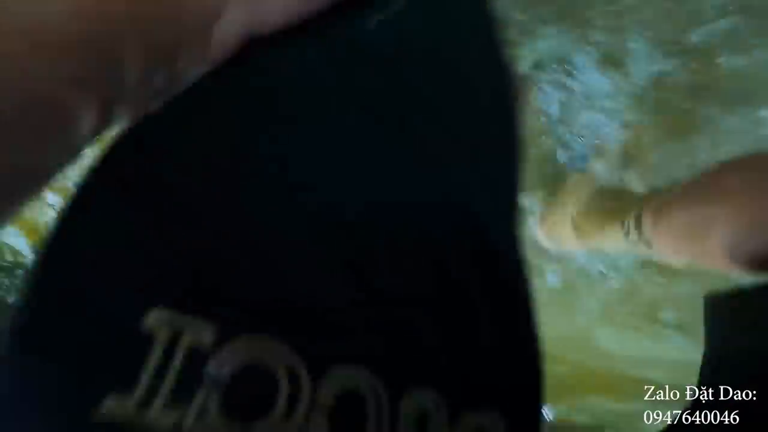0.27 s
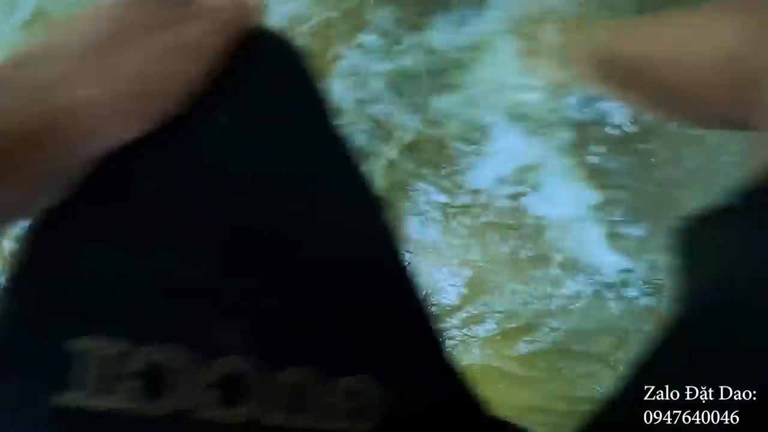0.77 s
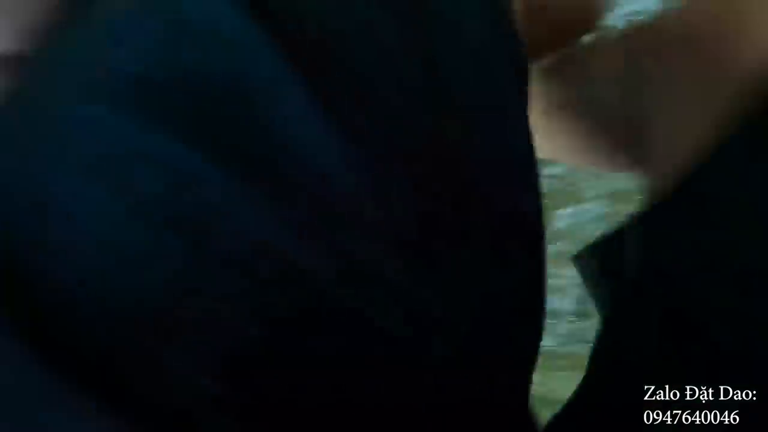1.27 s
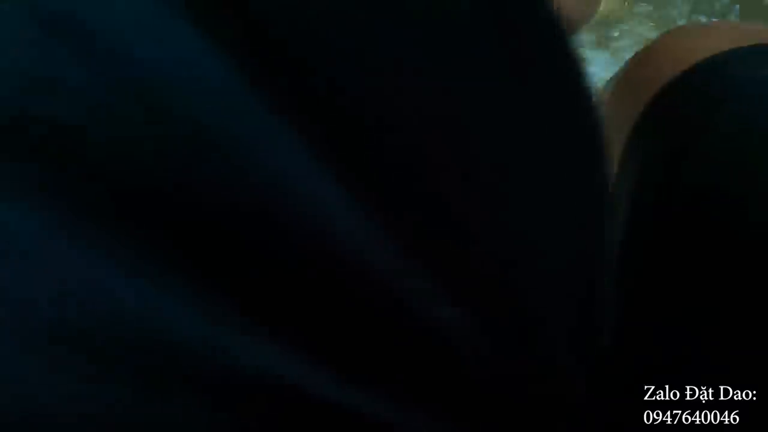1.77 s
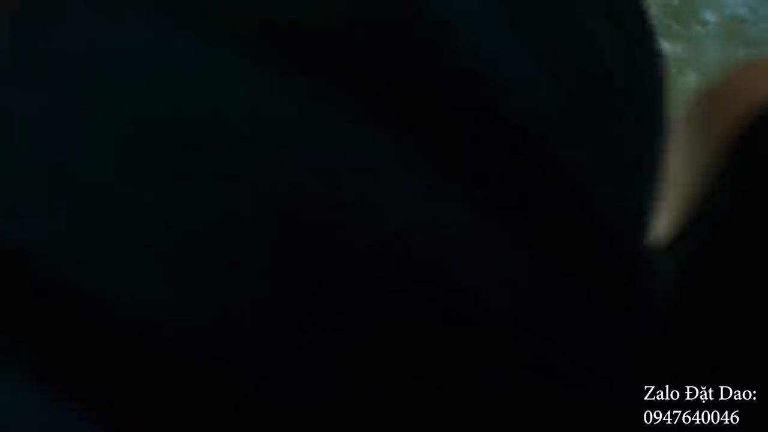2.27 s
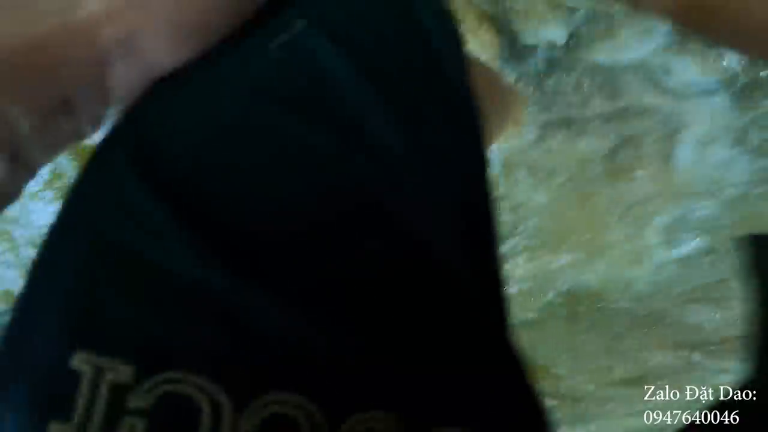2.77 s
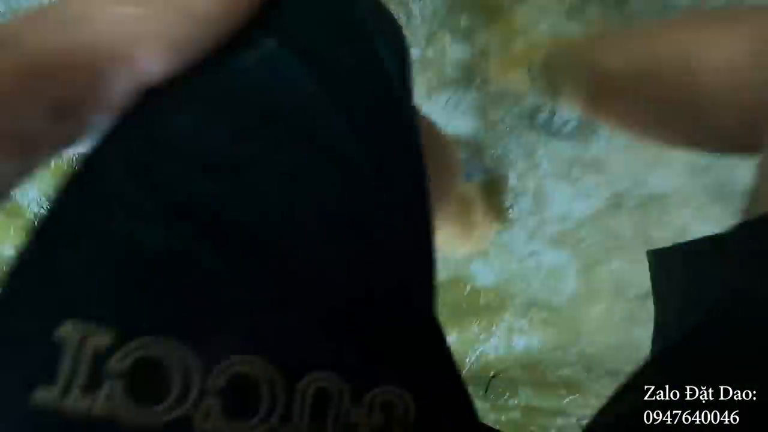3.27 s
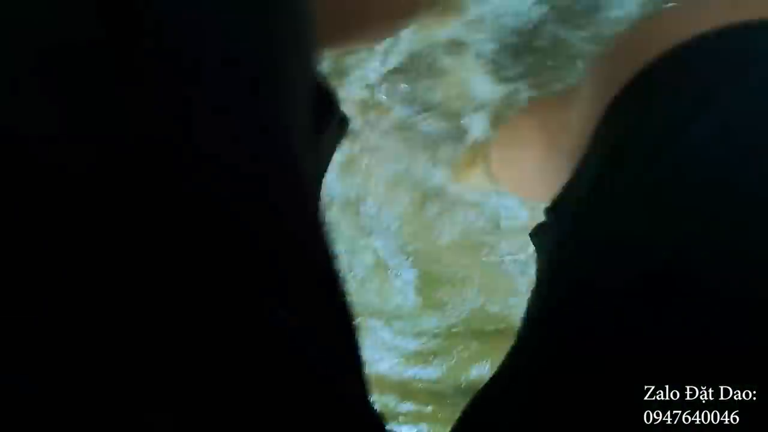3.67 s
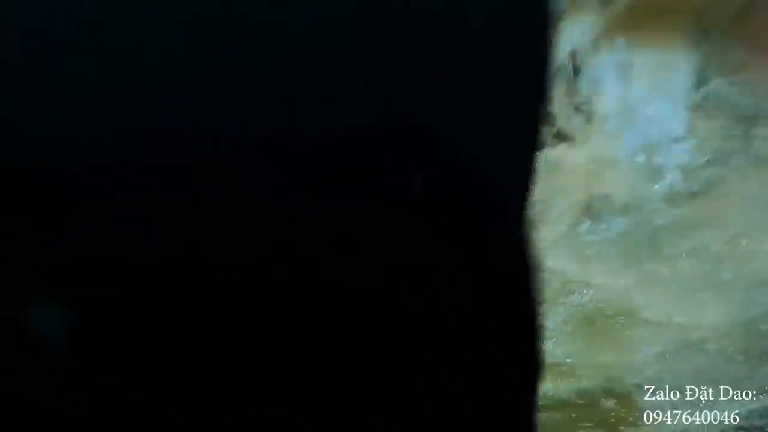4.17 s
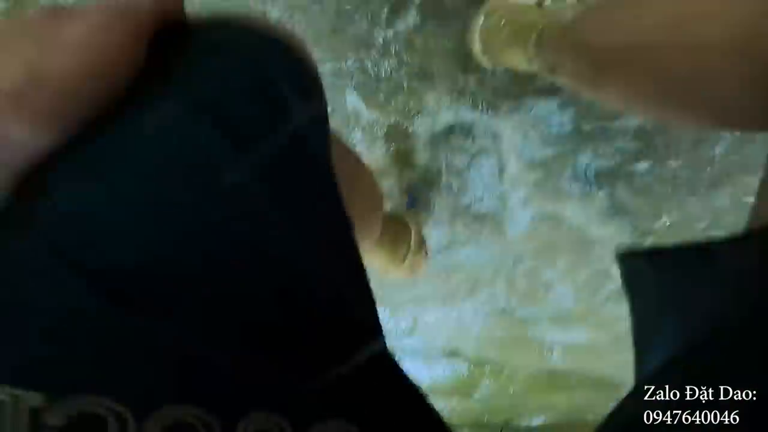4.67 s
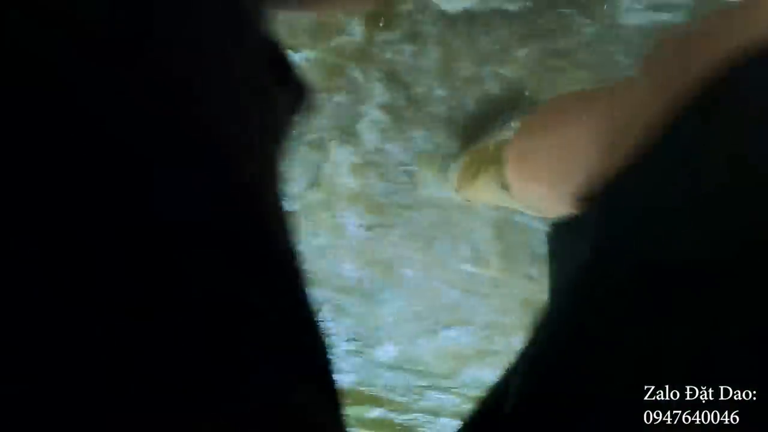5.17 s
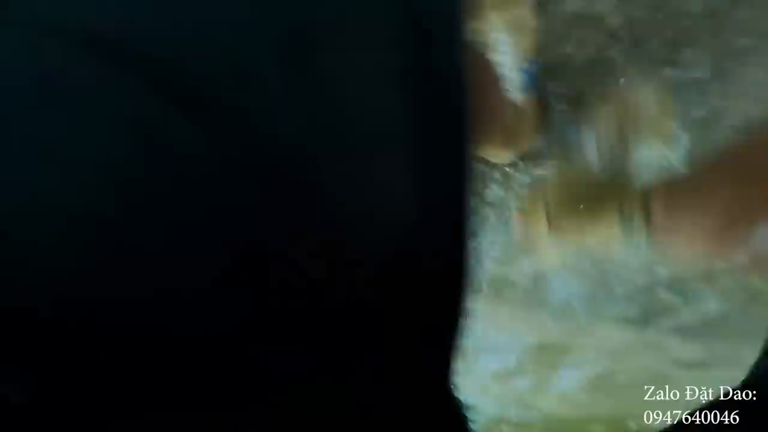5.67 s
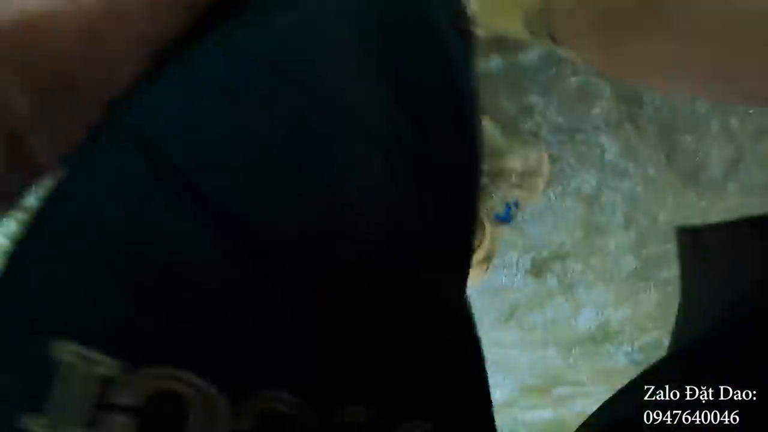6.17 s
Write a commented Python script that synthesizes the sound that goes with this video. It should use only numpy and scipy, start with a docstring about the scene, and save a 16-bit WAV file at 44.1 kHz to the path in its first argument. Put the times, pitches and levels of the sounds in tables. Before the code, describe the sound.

Shallow running water burbles and fizzes from start to finish, very close, while feet stamp and churn in it. Each step gives a wet smack and a short spray, often with a low thump just after and a deep slosh. Hollow bubbles gurgle and single drops plink between the steps. For the first 3.5 seconds the splashes are irregular and fairly dull, mixed with thick bubbling, with stronger ones near 0.7, 1.2, 1.6, 2.0, 2.4 and 2.7 seconds. From about 3.6 seconds the stamps fall into a steady pace, roughly one every 0.3 seconds, and grow brighter. The spray swells around 4.3 seconds. The sharpest smacks come between 4.8 and 6 seconds as the burble thins, with the deepest heave near 5.2. A last splash and a few bubbles land around 6.3 seconds. Everything is muffled and nearly mono, with a faint high hiss following the spray.

```python
"""A shallow running channel, where bare feet stamp and churn right under a sealed camera that muffles
the treble. Each stamp smacks and throws spray, then thumps as its air pocket closes. Large bubbles
burble and drops plink over a bed of small bubbles, and the water heaves low after each step.
All is mono but a thin hiss at the very top that follows the spray."""
import sys
import numpy as np
from scipy import signal
from scipy.fft import rfft, irfft, next_fast_len
from scipy.io import wavfile
from scipy.ndimage import map_coordinates

SR = 44100
rng = np.random.default_rng(int(sys.argv[2]) if len(sys.argv) > 2 else 0)


def generate_wav(sig):
    """Save sig (samples, or channels by samples) to the path in sys.argv[1] as 16-bit PCM at SR."""
    pcm = np.round(np.clip(np.atleast_2d(sig).T, -1, 1) * 32767).astype(np.int16)
    wavfile.write(sys.argv[1], SR, pcm)


N = 283762

# Bursts of thrown water. Each row: peak time in seconds, level in dB, length in ms,
# then the bright part and the top hiss, both as trims in dB on that level.
SPLASHES = [(0.148, -31, 20, -28, -28), (0.247, -28, 29, -15.5, -18.5), (0.348, -25.5, 8.8, -20, -16.5),
            (0.728, -24, 15, -13.5, -13.5), (0.837, -26.5, 31, -18.5, -31.5),
            (0.887, -31.5, 30, -20.5, -24), (1.194, -22.5, 11, -20, -16), (1.34, -35.5, 100, -20.5, -28),
            (1.432, -36, 39, -15.5, -29), (1.509, -34.5, 30, -15, -19), (1.582, -21, 19, -20.5, -32.5),
            (1.685, -30, 71, -23, -26.5), (1.964, -22.5, 23, -24.5, -23.5), (2.058, -26.5, 33, -24, -34),
            (2.125, -30.5, 29, -23.5, -25), (2.287, -27, 31, -16, -17.5), (2.359, -22.5, 46, -25, -32.5),
            (2.411, -24.5, 22, -33, -34), (2.671, -25.5, 38, -18.5, -31), (2.902, -34, 30, -13.5, -33),
            (2.999, -34, 20, -10, -14.5), (3.036, -25, 18, -18.5, -33.5), (3.343, -25, 23, -15, -24.5),
            (3.649, -21, 27, -18.5, -27.5), (3.75, -36, 39, -12.5, -22.5), (3.984, -23, 20, -10, -20.5),
            (4.065, -41, 16, -3.5, -37.5), (4.133, -41.5, 8.9, -7, -18.5), (4.277, -28, 36, -8, -19.5),
            (4.394, -38.5, 43, -3, -21.5), (4.567, -25.5, 40, -6.5, -24), (4.85, -27, 18, -2.5, -22),
            (5.127, -22.5, 31, -3.5, -19), (5.406, -23, 33, -6, -24.5), (5.689, -22.5, 20.5, -6.5, -24),
            (5.979, -23, 42.6, -8, -24), (6.193, -40, 15, 0, -25.5), (6.234, -22.5, 5.3, -6, -19.5),
            (6.279, -24.5, 16, -7, -32.5)]
def splash_envelopes():
    """Thrown water crests, then rains back: envelopes for its body, bright part and top hiss."""
    ms = (np.arange(SR // 2) - SR // 4) * 1000 / SR
    before, after = np.maximum(-ms, 0), np.maximum(ms, 0)
    raining = amp(-17) * (1 - np.exp(-after / 8)) * np.exp(-after / 65)
    power = np.zeros((3, N + SR))
    for s, db, length, bright_db, top_db in SPLASHES:
        rise_ms, fall_ms = 0.54 * length, 0.46 * length
        crest = .5 ** ((before / rise_ms) ** 0.92 + (after / fall_ms) ** 0.65)
        gains = amp(db + np.array([[0], [bright_db], [top_db]]))
        power[:, round(s * SR):][:, :len(ms)] += (crest ** 2 + raining ** 2) * gains ** 2
    return np.sqrt(power[:, SR // 4:][:, :N])


# The tone of a splash's body. Each row: frequency in Hz, gain in dB.
SLAP_EQ = [(150, 5), (500, 11.5), (1200, 4.5), (3000, -2), (5000, -42.5), (8000, -46), (11000, -61),
           (16000, -66)]
def splashes(body, bright):
    """Thrown water is ragged noise full of droplet clicks; its bright part drops the low end."""
    ragged = rng.standard_normal(N) * amp(3 * wobble(500) + wobble(120))
    bright_eq = [(1500, -39.5), (3500, -8.5), (5000, -18), (7000, -36), (9000, -49.5),
                 (11000, -51.5), (16000, -57)]
    return amp(4.5) * body * coloured(ragged, SLAP_EQ) + amp(-0.5) * bright * coloured(ragged, bright_eq)


# Sudden hits of water on water. Each row: start in seconds, level in dB, trim on the body in dB.
SMACKS = [(0.343, -28.5, 12), (0.722, -27, -5), (0.779, -26, 17), (0.835, -24.5, -5), (1.195, -21, 9),
          (1.3364, -30.5, 17.5), (1.576, -24.5, 1), (1.967, -23, -9), (2.2764, -28.5, 8), (2.346, -28, 7),
          (2.9756, -30.5, 8), (2.994, -28.5, -5), (3.028, -27.5, 15.5), (3.34, -21, 0), (3.6162, -26, 13),
          (3.6446, -21, 7), (3.749, -31.5, 10), (3.9438, -21.5, -12), (3.9823, -20.5, 4), (4.264, -19.5, 0),
          (4.5466, -23.5, 4), (4.828, -29, 17), (4.8489, -14.5, -1), (4.861, -22, -6), (5.094, -23, 7),
          (5.107, -18, 7), (5.393, -18, -11), (5.6793, -17.5, 9.5), (5.977, -18, -8), (6.231, -24, 6),
          (6.27, -32, 9)]
def smacks(t60_s=0.055):
    """Water hits water with a bright crack and a dull body. Returns the sound and the crack envelope."""
    t = np.arange(SR // 5) / SR
    envelopes = np.zeros((2, N + SR))
    for s, db, body_db in SMACKS:
        envelopes[:, round(s * SR):][:, :len(t)] += amp(db + np.array([[0], [body_db]]) - 60 * t / t60_s)
    soften = np.hanning(SR // 300)  # water gives: a 2 ms attack
    crack, body = signal.fftconvolve(envelopes, soften[None] / soften.sum(), axes=1)[:, :N]
    crack_eq = [(1500, -15.5), (3500, 7), (5000, -10), (8000, -28), (11000, -39.5), (16000, -56)]
    body_eq = [(300, -19.5), (700, 3.5), (1300, 0), (2500, -15), (4000, -28), (16000, -91)]
    return amp(-7) * crack * noise(crack_eq) + amp(-5.5) * body * noise(body_eq), crack


# Air pockets closing behind the foot. Each row: time in seconds, level in dB, starting pitch in Hz.
AIR_POCKETS = [(0.3624, -22, 154), (0.486, -28, 117), (0.679, -25, 116), (0.7815, -21, 157),
               (1.6093, -32, 110), (1.977, -29.5, 169), (2.7007, -16.5, 102), (3.035, -20, 108),
               (3.352, -18, 104), (3.6611, -28, 161), (3.992, -26, 96), (4.3068, -22.5, 106),
               (4.5927, -15, 116), (4.869, -22, 111), (5.1405, -17.5, 101.5), (5.4203, -22, 111),
               (5.7, -17.5, 143), (5.9947, -17.5, 120), (6.243, -23.5, 115)]
def thumps():
    """A closing pocket first pulls, then pushes, and rings out in about two swings."""
    out, t = np.zeros(N + SR), np.arange(SR // 8) / SR
    for s, db, hz in AIR_POCKETS:
        sagging_tone = -np.sin(2 * np.pi * hz * t * (1 - 1.3 * t))
        envelope = (1 - np.exp(-t / 0.0016)) * amp(-60 * (t / 0.039) ** 1.65)
        out[round((s - .3 / hz) * SR):][:len(t)] += amp(db + 8.5) * envelope * sagging_tone
    return out[:N]


# Large single bubbles. Each row: peak time in seconds, level in dB, pitch in Hz, length in ms.
BUBBLES = [(0.143, -15, 1503, 6.4), (0.2251, -11, 460, 6.2), (0.247, -15, 1206, 5),
           (0.3503, -10, 462, 11.5), (0.3764, -11.5, 470, 6.4), (0.4177, -14, 431, 11),
           (0.5644, -15.5, 247, 13), (0.5689, -17.5, 587, 5.9), (0.6033, -19, 384, 18),
           (0.6648, -15.5, 544, 5), (0.672, -14, 1330, 6.7), (0.8215, -8.5, 536, 4.9),
           (0.916, -18.5, 496, 15), (1.141, -18.5, 540, 15), (1.1921, -21, 623, 13), (1.3293, -20, 382, 11),
           (1.3326, -16.5, 970, 4.6), (1.3663, -10, 614, 3.7), (1.5273, -20.5, 530, 9.8),
           (1.5793, -14.5, 520, 36), (1.6395, -11, 857, 4.2), (1.649, -19, 485, 23), (1.6891, -6.5, 676, 4),
           (1.7917, -18.5, 440, 7.9), (2.058, -18, 1250, 6.5), (2.061, -12, 427, 8),
           (2.2933, -16.5, 820, 5), (2.304, -16.5, 500, 9.3), (2.3881, -16, 530, 12),
           (2.4076, -15, 1020, 8.5), (2.4271, -20, 420, 8), (2.6404, -17, 1030, 8.3),
           (2.6563, -6.5, 520, 3.1), (2.683, -18, 1030, 7), (2.6857, -11, 546, 5.1), (2.733, -17, 592, 12),
           (2.7481, -18.5, 1104, 13), (2.7732, -14.5, 456, 10), (2.8878, -13.5, 420, 7.2),
           (2.9823, -12.5, 1000, 3.7), (2.983, -8, 481, 14), (2.995, -10.5, 550, 5.9),
           (3.136, -13, 590, 8.2), (3.146, -15.5, 598, 19), (3.32, -14.5, 563, 15), (3.376, -17.5, 390, 10),
           (3.453, -16.5, 454, 12), (3.5806, -12, 427, 13), (3.629, -16.5, 696, 19),
           (3.6456, -11.5, 990, 6), (3.6535, -13.5, 436, 7.5), (3.7134, -14, 410, 11),
           (3.752, -16.5, 1100, 7.1), (3.7687, -8.5, 417, 4.5), (3.7855, -16.5, 1000, 8.9),
           (3.787, -12, 433, 19), (3.9085, -10.5, 600, 2.7), (3.9717, -12.5, 570, 4.3),
           (4.0032, -14, 530, 9.8), (4.202, -13, 456, 8.3), (4.2776, -15, 650, 5), (4.3019, -16, 610, 6.2),
           (4.37, -13.5, 583, 9.8), (4.383, -17.5, 606, 16), (4.4176, -16, 406, 6.3),
           (4.5065, -15.5, 1350, 4), (4.5695, -14.5, 584, 6.6), (4.5668, -16.5, 900, 10),
           (4.5716, -9.5, 1440, 4.8), (5.132, -13, 1335, 8.3), (5.397, -16.5, 1170, 14),
           (5.4015, -14, 505, 4.9), (5.6959, -5.5, 223, 3.9), (5.717, -19, 209, 13), (5.9005, -8, 399, 5.3),
           (5.9459, -10.5, 562, 13.4), (5.9705, -16.5, 2570, 5), (6.0233, -8, 455, 2.6),
           (6.227, -12.5, 490, 7), (6.249, -10, 520, 17)]
def bubbles():
    """Bubbles ring and bend up as they near the surface; churn flutters them, the smaller ones faster."""
    s, db, hz, ms = np.transpose(BUBBLES)
    rise, fall = 0.44 * ms / 1000, 0.56 * ms / 1000
    small = hz > 850
    def ring(rows):
        return blips(s[rows], amp(db[rows] - 0.5), hz[rows], rise[rows], fall[rows], 0.073, size=4000)
    return amp(3 * wobble(200) - 1) * ring(~small) + amp(4 * wobble(450) - 2) * ring(small)


# Single drops and pops. Each row: start in seconds, level in dB, starting pitch in Hz.
DROPS = [(0.082, -12.5, 403), (0.15, -24, 2850), (0.953, -20, 482), (1.032, -15.5, 590),
         (2.2012, -20.5, 2820), (3.192, -14, 312), (3.298, -9.5, 465), (3.504, -15.5, 1086),
         (4.0657, -17.5, 3600), (4.131, -31, 4880), (4.788, -12.5, 1480), (5.489, -12, 496),
         (5.823, -19, 1050), (6.091, -14.5, 526), (6.1927, -22.5, 2140), (6.325, -13, 445)]
def drops(low_t60_s=0.038, half_ring_hz=2800):
    """A drop opens a small cavity that rings at once and dies, pitch climbing; small ones die sooner."""
    out, t = np.zeros(N + SR), np.arange(SR // 5) / SR
    attack = 1 - np.exp(-t / 0.00041)
    for s, db, hz in DROPS:
        fade = amp(db - 60 * t * (1 + hz / half_ring_hz) / low_t60_s)
        chirp = np.sin(2 * np.pi * hz * t * (1 + 2.6 * t))
        out[round(s * SR):][:len(t)] += attack * fade * chirp
    return out[:N]


# Fader moves for the churned water. Each row: time in seconds, burble level in dB, spray level in dB.
CHURN = [(0.0, -30.5, -38.5), (0.29, -27, -39), (0.57, -24, -31.5), (0.66, -25.5, -30.5),
         (0.84, -21, -31.5), (1.02, -31, -35), (1.36, -23, -32.5), (1.54, -29.5, -34.5),
         (1.66, -24.5, -32.5), (1.77, -23, -35.5), (1.9, -31.5, -33.5), (2.04, -25.5, -32.5),
         (2.25, -29, -37), (2.45, -21, -33.5), (2.55, -28, -36), (2.74, -20, -31.5), (2.88, -33.5, -37),
         (3.08, -24, -35), (3.24, -32.5, -36), (3.38, -28.5, -30.5), (3.53, -30.5, -34), (3.72, -27, -32.5),
         (4.06, -34.5, -37), (4.22, -25.5, -29), (4.3, -27.5, -26.5), (4.37, -31, -31), (4.47, -25, -26.5),
         (4.6, -29.5, -32.5), (4.72, -34.5, -36), (5.0, -32, -34), (5.14, -39, -35.5), (5.48, -32, -35.5),
         (5.57, -37, -40.5), (5.88, -28.5, -35.5), (6.18, -38, -39.5), (6.26, -28.5, -35.5),
         (6.43, -39.5, -41)]
# The tones of the hollow burble and of the fine spray. Each row: frequency in Hz, gain in dB.
BURBLE_EQ = [(35, -38), (60, -21), (107, -10), (189, -1), (365, -6), (490, 1.5), (864, -8.5), (1330, -6),
             (1500, -18), (1950, -42.5), (3300, -120)]
SPRAY_EQ = [(410, -20.5), (700, -11.5), (881, -8), (1330, -4.5), (1680, -7.5), (2890, -10.5), (3430, -15.5),
            (5380, -33), (8440, -52.5), (11000, -71), (14300, -103), (22000, -120)]
def stream():
    """A swelling bed of mid-sized bubbles and fizz, each on noise. Returns it and the spray fader."""
    burble_db, spray_db = curves(CHURN)
    swell_db = 1.2 * wobble(18)
    wash = noise(BURBLE_EQ)
    gurgle = swarm(1100, mid_hz=498.7, octaves=0.405, cycles=2.96, spread_db=2.1, size=1600)
    hiss = rng.standard_normal(N)
    pops = swarm(4000, mid_hz=2137, octaves=0.875, cycles=3.1, spread_db=3.7, size=400)
    plinks = swarm(350, mid_hz=3200, octaves=0.45, cycles=8.1, spread_db=3.5, size=400)
    fizz = coloured(hiss + 0.4 * pops, SPRAY_EQ) + 0.25 * coloured(plinks, SPRAY_EQ)
    burble = amp(burble_db + 1 + swell_db + wobble(35)) * unit(0.73 * wash + 0.67 * gurgle)
    spray = amp(spray_db - 1 + swell_db + wobble(45)) * unit(fizz)
    return burble + spray, spray_db


# Low heaves of water after a step. Each row: peak time in seconds, level in dB.
HEAVES = [(0.23, -45), (0.38, -40), (0.57, -42), (0.72, -27), (1.07, -33.5), (1.21, -38), (1.38, -33.5),
          (1.59, -42), (1.96, -44), (2.11, -44), (2.29, -46), (2.45, -43), (2.78, -37.5), (3.11, -35),
          (3.35, -40), (3.45, -40), (3.71, -28.5), (3.99, -35), (4.11, -26.5), (4.29, -37), (4.37, -33),
          (4.66, -30.5), (4.86, -33.5), (4.93, -32), (5.17, -22.5), (5.41, -36), (5.48, -32), (5.72, -31),
          (5.95, -43), (6.18, -33.5), (6.3, -31.5)]
# The sub-bass tone of the heaving. Each row: frequency in Hz, gain in dB.
SLOSH_EQ = [(10, 4), (30, 8.5), (60, 0.5), (120, -20), (300, -70)]
def slosh(rise_db_per_s=250.5, fall_db_per_s=160, calm_db=-57.5):
    """Water and air heave at the microphone: uneven low swings that swell after each step."""
    t = np.arange(N) / SR
    swells_db = [db - np.where(t < s, rise_db_per_s, fall_db_per_s) * np.abs(t - s) for s, db in HEAVES]
    rumble = unit(np.tanh(3.3 * noise(SLOSH_EQ)))
    return (amp(calm_db) + amp(np.max(swells_db, axis=0))) * rumble


# The tone of the hiss at the very top. Each row: frequency in Hz, gain in dB.
HISS_EQ = [(10500, -74.5), (11600, -26), (12400, -3.5), (13000, 1.5), (14000, -5.5), (15600, -12)]
def top_hiss(spray_db, flare):
    """A thin crackle above 12 kHz, unrelated left and right, follows the spray and flares in splashes."""
    level = np.hypot(amp(0.51 * spray_db - 43), amp(-2) * flare)
    flicker = amp(2.5 * wobble(300) + 1.5 * wobble(40))
    return level * unit(flicker * noise(HISS_EQ, shape=(2, N)))


def swarm(count, mid_hz, octaves, cycles, spread_db, size):
    """Random small bubbles pitched around mid_hz, each ringing a few cycles, some louder than others."""
    s = rng.uniform(0, N / SR, count)
    hz = np.clip(mid_hz * 2 ** (octaves * rng.standard_normal(count)), 120, SR / 4)
    gain = amp(spread_db * np.minimum(rng.exponential(size=count), 3))
    return unit(blips(s, gain, hz, rise=0.3 * cycles / hz, fall=0.87 * cycles / hz, glide=0.13, size=size))


def blips(s, gain, hz, rise, fall, glide, size):
    """Upward-gliding tones of size samples, peaking at s: 6 dB up over rise, down over fall (seconds)."""
    t = (np.arange(size) - size // 2) / SR
    before, after = np.maximum(-t, 0) / rise[:, None], np.maximum(t, 0) / fall[:, None]
    envelope = .5 ** (before ** 2.3 + after ** 1.28)
    bend = 1 + glide * t / (rise + fall)[:, None] / 2
    phase = 2 * np.pi * hz[:, None] * t * bend + rng.uniform(0, 2 * np.pi, (len(s), 1))
    tones = gain[:, None] * envelope * np.sin(phase)
    at = np.clip(np.round(s * SR).astype(int)[:, None] + np.arange(size), 0, N + size)
    return np.bincount(at.ravel(), tones.ravel(), N + size + 1)[size // 2:][:N]


def amp(db):
    """Gain of a level in dB."""
    return 10 ** (np.asarray(db) / 20)


def unit(x):
    """Scaled to rms 1."""
    return x / np.sqrt(np.mean(x ** 2) + 1e-20)


def curves(rows):
    """One value per sample for each column after the time."""
    s, *columns = np.transpose(rows)
    return [np.interp(np.arange(N) / SR, s, column) for column in columns]


def wobble(rate):
    """A smooth random curve, rate knots a second."""
    return map_coordinates(rng.standard_normal(int(N * rate / SR) + 4), [np.arange(N) * rate / SR])


def coloured(x, eq):
    """x through an EQ of (Hz, dB) points on a log axis, rms 1."""
    m = next_fast_len(N + 8192)
    hz, db = np.transpose(eq)
    gain = amp(np.interp(np.log(np.fft.rfftfreq(m, 1 / SR) + 1), np.log(hz + 1), db))
    return unit(irfft(rfft(x, m) * gain, m)[..., :N])


def noise(eq, shape=N):
    """White noise through an EQ, rms 1."""
    return coloured(rng.standard_normal(shape), eq)


def scene():
    """The water in mono, the top hiss in stereo."""
    body, bright, top = splash_envelopes()
    smack, crack = smacks()
    bed, spray_db = stream()
    water = bed + splashes(body, bright) + smack + thumps() + bubbles() + drops() + slosh()
    return water + top_hiss(spray_db, flare=np.hypot(top, amp(-21) * crack))


def record(dry, ceiling=0.68, band_limit_hz=15760):
    """The loudest splash peaks are softly rounded off; the camera keeps nothing above its band limit."""
    mid, side = (dry[0] + dry[1]) / 2, (dry[0] - dry[1]) / 2
    mid = mid / (1 + np.abs(mid / ceiling) ** 4) ** (1 / 4)
    m = next_fast_len(N + 8192)
    passband = np.fft.rfftfreq(m, 1 / SR) < band_limit_hz
    return irfft(rfft([mid + side, mid - side], m) * passband, m)[:, :N]


dry = scene()
out = record(dry)
generate_wav(out)
```